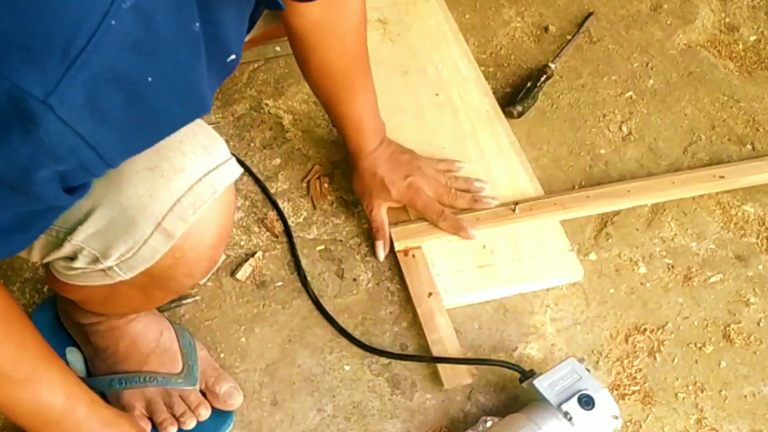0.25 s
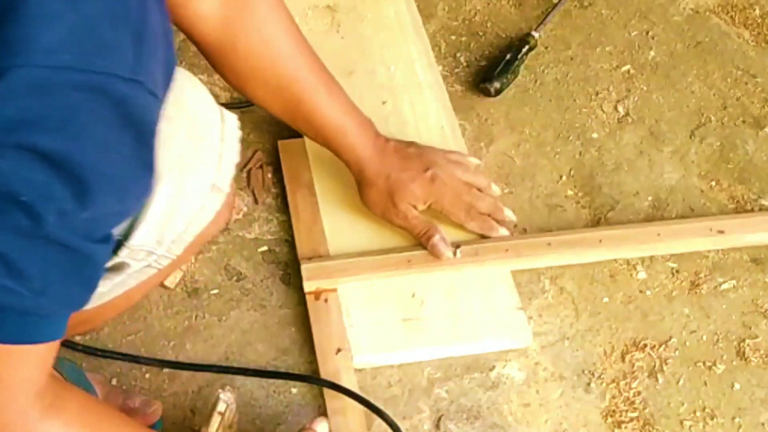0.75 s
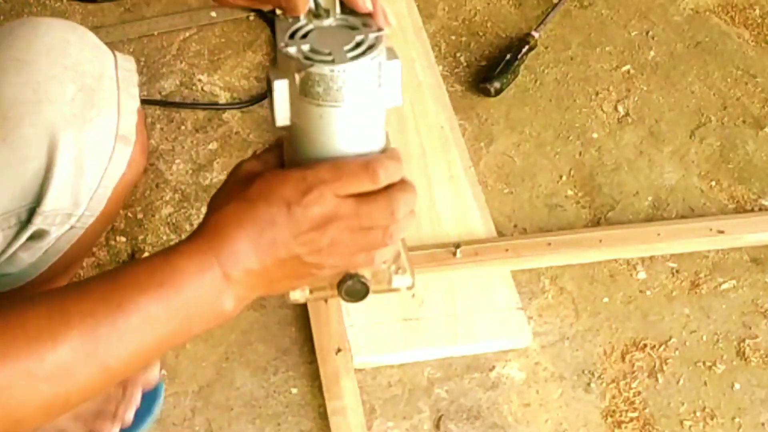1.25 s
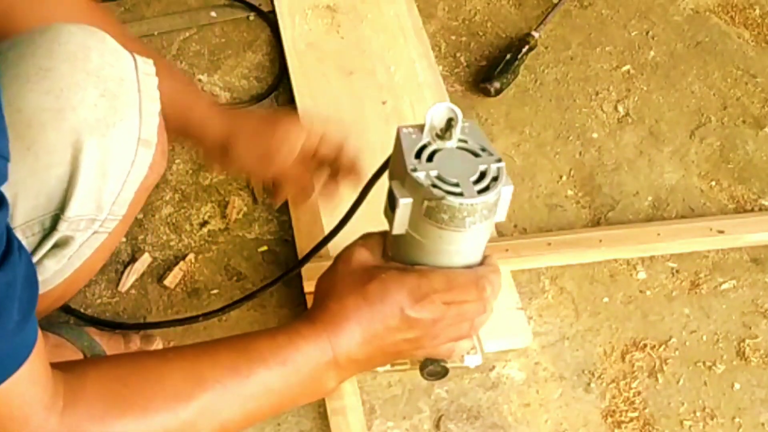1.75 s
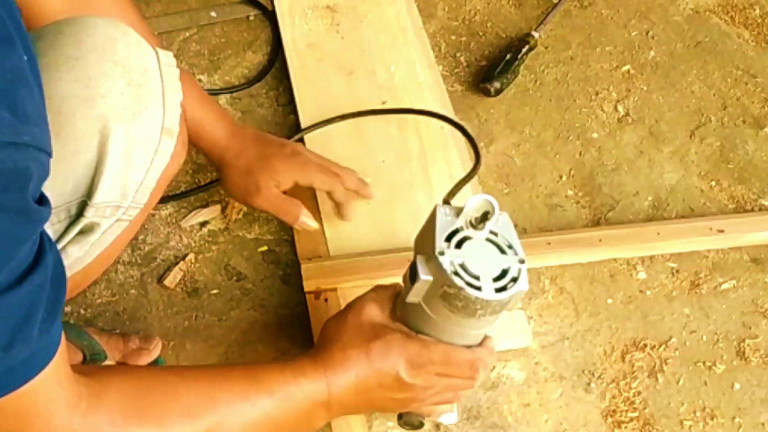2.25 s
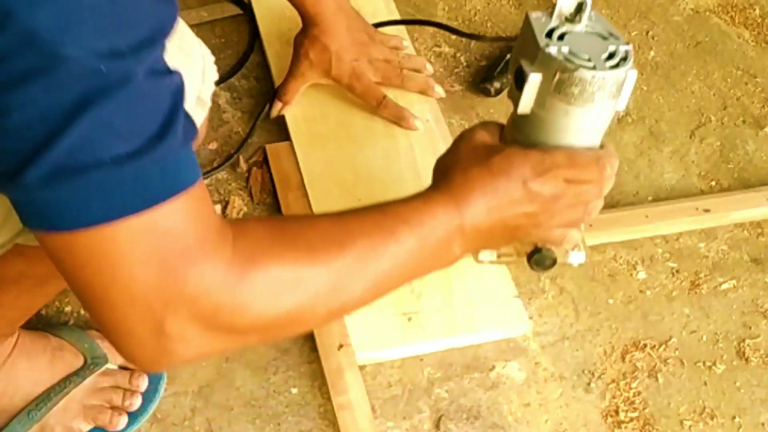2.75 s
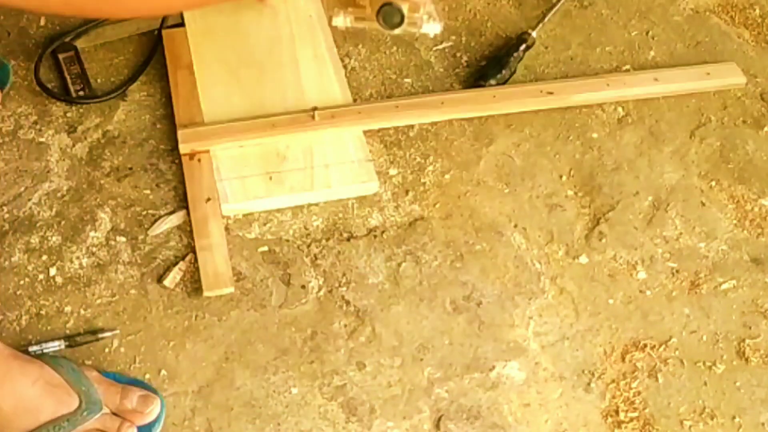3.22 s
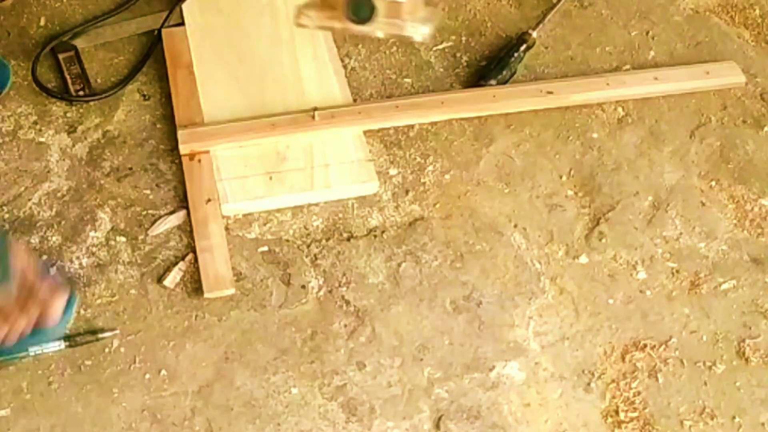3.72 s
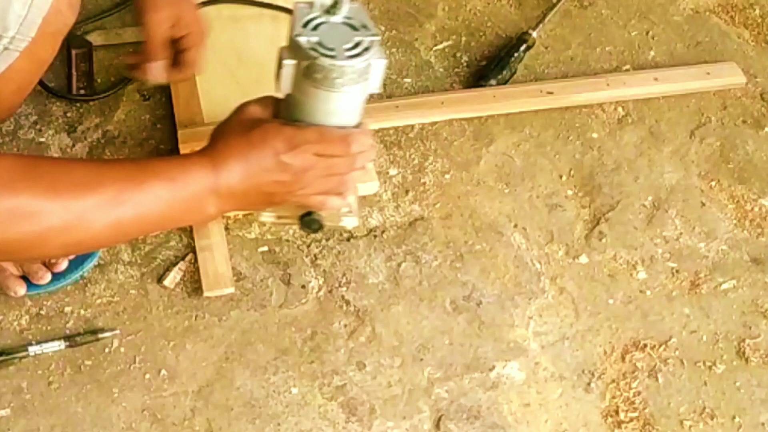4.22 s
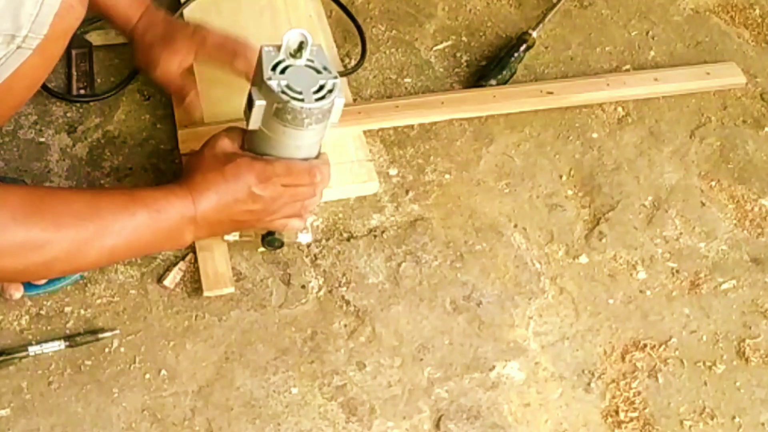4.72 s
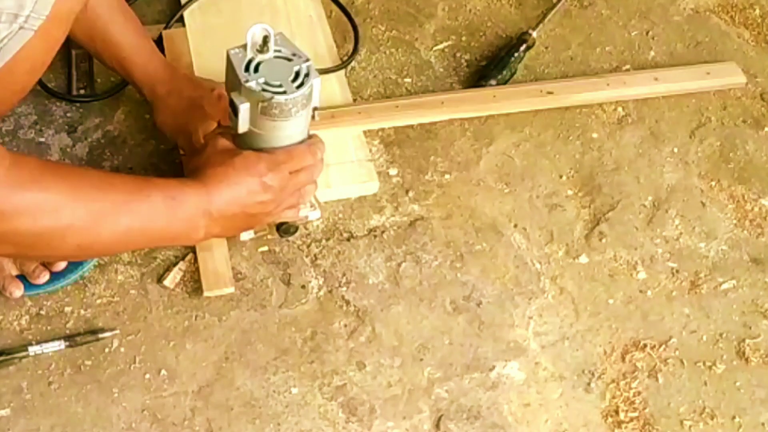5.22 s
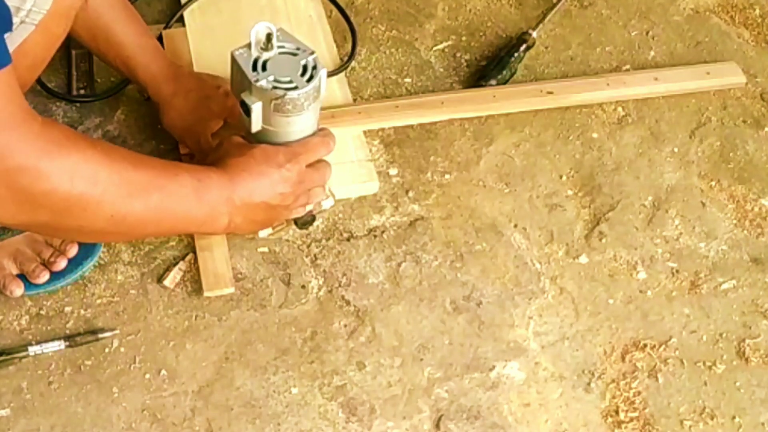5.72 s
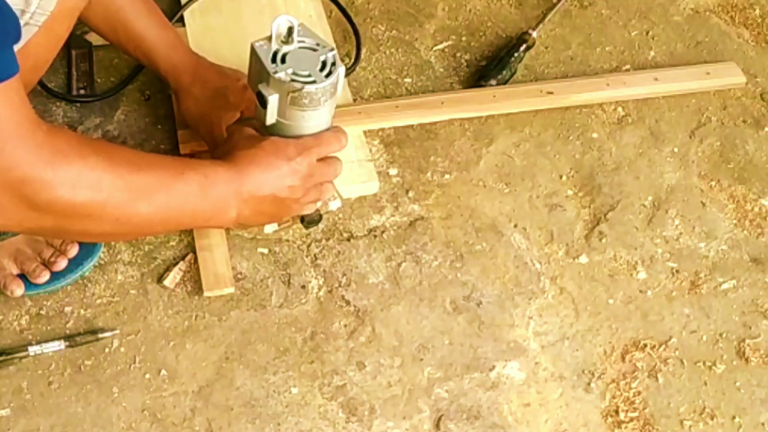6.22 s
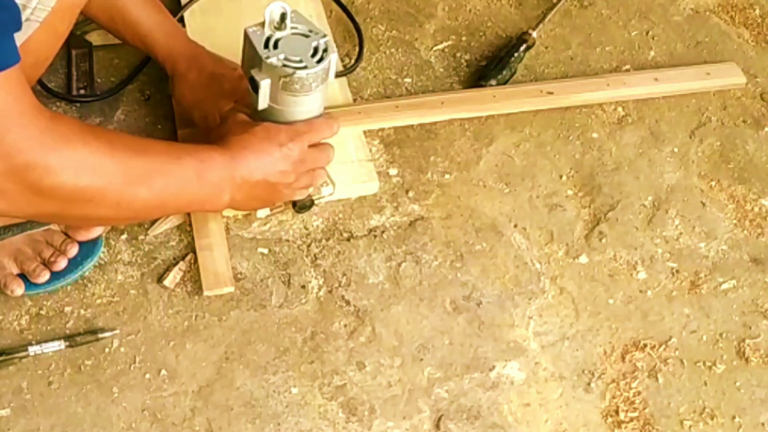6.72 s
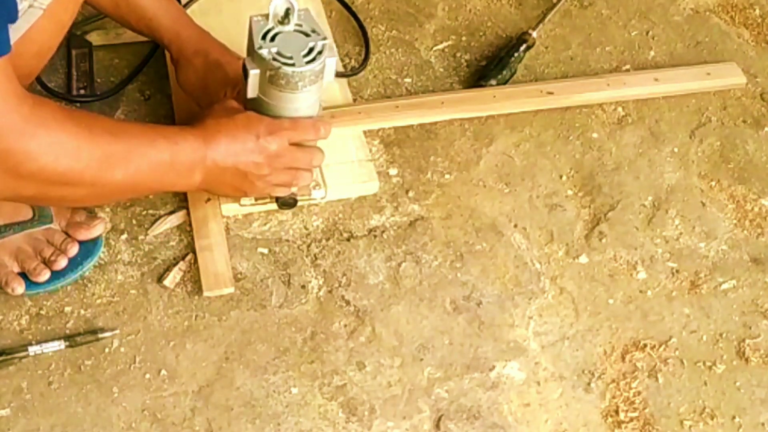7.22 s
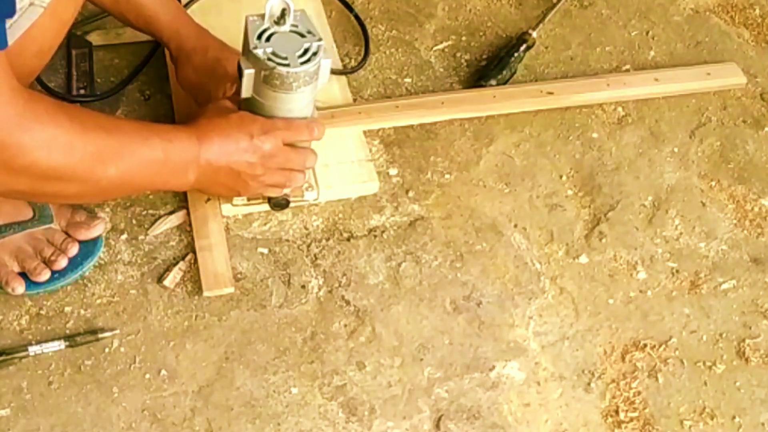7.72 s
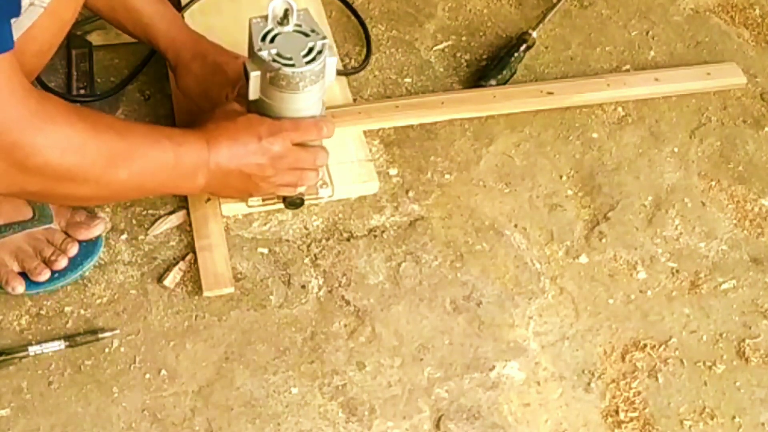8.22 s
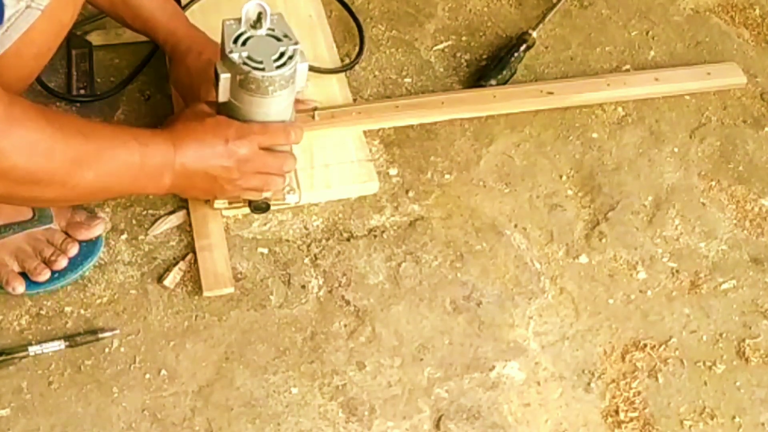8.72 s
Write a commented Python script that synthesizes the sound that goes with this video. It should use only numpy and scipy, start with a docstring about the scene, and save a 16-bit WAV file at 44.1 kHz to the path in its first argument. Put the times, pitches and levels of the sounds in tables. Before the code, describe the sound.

Close stereo pickup of woodworking on a hard floor. Soft rumble and small handling noises come first, then an electric trim router starts with a rough rising whirr and settles into a bright whine with strong fan hiss. One dull knock on wood while it runs free. After the base settles on the board, uneven bites of cutting buzz and squeal, the motor labouring lower between partial recoveries until the end.

```python
"""A workshop floor: a small trim router is picked up from a board amid low rumble, a squeak, scuffs and knocks.
Shaped noise makes the rumble and scuffs, gliding harmonics the squeak, and decaying wood modes the knocks.
Switched on, it spins up: its six-bladed fan whines in multiples of the shaft over a rush of air noise.
Then the two-flute bit is pushed into the wood again and again; each push drags the motor down.
The cut buzzes and squeals on multiples of the same shaft, with a rasp of bursting noise."""
import sys
import numpy as np
from scipy import signal
from scipy.fft import rfft, irfft, next_fast_len
from scipy.io import wavfile
from scipy.ndimage import uniform_filter1d, map_coordinates

SR = 44100
rng = np.random.default_rng(int(sys.argv[2]) if len(sys.argv) > 2 else 0)


def wav_record(signal):
    """Record a signal, one row per channel, as 16-bit PCM in the file named by sys.argv[1]."""
    frames = np.transpose(np.atleast_2d(signal))
    bounded = np.clip(frames, -1, 1)
    # unit amplitude maps onto the largest positive 16-bit level
    quanta = np.round(bounded * 32767).astype(np.int16)
    wavfile.write(sys.argv[1], SR, quanta)


N = 395136
T = np.arange(N) / SR  # seconds

# Colours are relative: each noise is brought to rms 1 before its level is set.
# colour of the background: freq_hz, density_db (per Hz)
SHOP_COLOUR = [(25, -31), (70, -13.5), (130, -2.5), (185, -0.5), (250, 4.5), (330, -4), (430, 0.5),
               (700, -9.5), (1200, -29), (4000, -31.5), (15000, -40)]
# level of the background, before its left-right balance: time_s, level_db
RUMBLE_LEVEL = [(0, -45), (.52, -44), (.63, -55), (.67, -41), (1.45, -42), (2.25, -46), (3.9, -41.5),
                (4.6, -49), (5.6, -53), (8.96, -50.5)]
# likeness of the two ears in every noise: freq_hz, correlation (0-1)
EAR_LIKENESS = [(100, 0.97), (1000, 0.64), (2200, 0.62), (4000, 0.052)]

# harmonics of the rough squeak: harmonic_number, relative_level_db
SQUEAK_HARMONICS = [(2, -6), (3, 3.5), (4, -7), (5, -4)]
# lines of the thin squeak: pitch_hz, level_db
THIN_SQUEAK = [(1810, -60), (2480, -64)]
# dull knocks on wood: start_s, level_db, pitch_hz, t60_s
KNOCKS = [(0.334, -40, 413, 0.043), (3.578, -16.5, 397, 0.052), (4.262, -37.5, 134, 0.17)]
# short rushes of noise, from handling, shuffling feet, the starting motor and the sliding base:
# start_s, length_s, level_db (before the grain), centre_hz, fall_db_per_octave (to either side)
SCUFFS = [(0.335, 0.014, -49, 850, 6.5), (0.65, 0.05, -51.5, 1100, 14), (.69, 0.05, -55, 6000, 12),
          (0.896, 0.079, -52, 2400, 4), (1.171, 0.068, -40.5, 1900, 4), (1.456, .006, -33, 4950, 8),
          (1.46, 0.59, -32, 15000, 13), (1.472, 1, -31.5, 1500, 7), (1.957, 0.58, -26, 2240, 87),
          (3.473, 0.27, -34.5, 340, 6), (4.211, 0.18, -41.5, 178, 10), (8.604, 0.19, -40, 446, 33)]

SWITCH_ON_S = 1.456
# the motor gathers speed in a quick, a middle and a slow stage: gain_turns_per_s, time_constant_s
SPIN_UP = [(180, .063), (246, .36), (124, 1.25)]
# each push of the bit into the wood:
# start_s, length_s, drag_turns_per_s, flute_level_db, octave_level_db, double_octave_level_db
PUSHES = [(5.232, 0.23, 11, -33, -34.5, -38), (5.433, 0.18, 33.4, -33.5, -26.5, -40),
          (5.581, .13, 55, -18, -30, -39), (5.723, .17, 49, -26, -26.5, -34),
          (5.887, 0.21, 21.3, -55, -41, -27), (6.475, 0.038, 4.2, -31, -50, -50),
          (6.668, 0.21, 22.2, -19.5, -42, -41), (7.083, 0.063, 21.5, -28, -50, -50),
          (7.255, .29, 33, -32.5, -40, -33), (7.753, 0.38, 56.3, -34, -45, -32.5),
          (8.272, 0.21, 11.7, -51, -35.5, -39), (8.7, 0.44, 66, -34, -31.5, -35)]
# steady drag of the bit as the slot deepens: time_s, drag_turns_per_s
SLOT_DRAG = [(5.3, 0), (6.1, 24), (7.6, 36.4), (8.3, 64)]
PUSH_RAMP_S, INERTIA_S = .03, .267  # a push sets in quickly; the motor's speed follows slowly
FULL_SAG = 280  # turns per second lost at full load
REFERENCE_SPEED = 611.6  # turns per second at which the fan's overtone and air levels are stated

# colour of the fan's air: freq_hz, density_db (per Hz)
AIR_COLOUR = [(120, -34), (400, -16), (942, -2.5), (1200, -2.5), (2320, 1.5), (4090, -1), (5650, 0.5),
              (9790, -5), (13100, -14.5), (15500, -13.5)]
AIR_DB, AIR_GROWTH_DB = -20.5, 54.5  # air at the reference speed; dB per tenfold speed
BRUSH_DB = -34.5  # hiss of the brushes, at any speed
PATCH_DB = 1.1  # depth of the shifting patches in the air and the rasp

# level of the fan's whine, before resonances, shake and fades: time_s, level_db
WHINE_LEVEL = [(1.55, -32), (1.7, -25), (1.87, -19), (2.1, -24.5), (2.7, -20), (3.2, -24.5), (4.8, -26),
               (5.35, -22), (7.9, -22), (8.4, -26.5), (8.9, -23)]
# as the tool is moved, a reflection cancels the whine at one ear or both; a negative loss lifts it:
# centre_s, half_length_s, left_loss_db, right_loss_db
WHINE_FADES = [(1.617, 0.013, 11, 11), (1.813, 0.016, 22, 12), (2.012, 0.017, 15, 15), (2.305, 0.13, 14, 7),
               (2.915, 0.053, 20, 1), (3.156, 0.14, 2, 13), (3.37, 0.07, 14, -6.5), (3.59, 0.061, 15, 12),
               (3.72, 0.11, 24, -1), (3.924, 0.035, 16, 14), (4.584, 0.023, 13, 15), (5.675, 0.13, 14, 10),
               (6.089, 0.066, 9, 13), (6.269, 0.11, 2.5, 15), (6.757, 0.025, 7, 12), (7.353, 0.038, 6, 5),
               (7.494, 0.035, 3, 24), (7.809, 0.014, 7, 9), (7.982, .018, 13, 4), (8.137, 0.055, 8, 1),
               (8.639, 0.095, 11, 17)]
# overtones of the blades and weaker tones of the rotor: shaft_multiple, relative_level_db, full_load_change_db
FAN_OVERTONES = [(7, -7, -2), (12, -4.5, 0), (18, .5, -2.5), (24, -2, -7)]
SHRILL_DB, SHRILL_GROWTH_DB = -33.5, 40  # overtones at the reference speed; dB per tenfold speed
START_SHAKE_DB = 5  # extra flutter of the whine at standstill, fading as the motor gathers speed
# a notch and two resonances of the housing: centre_hz, width_hz, gain_db
HOUSING = [(2920, 310, -3), (5580, 350, 6.5), (8540, 120, 11)]

# lines of the starting whirr, before its envelope, crackle and resonances: shaft_multiple, level_db
INRUSH_LINES = [(12, -31), (24, -36.5)]
INRUSH_RISE_S, INRUSH_FALL_S = .03, .15  # starting current
# resonances of the motor frame, met by the hum and the starting whirr: centre_hz, width_hz, boost_db
FRAME = [(470, 25, 11), (2800, 400, 14), (4900, 200, 12)]

# colour of the motor and bit on the board: freq_hz, density_db (per Hz)
RASP_COLOUR = [(90, -38), (620, -15.5), (950, 1.5), (1250, -5), (2150, 4), (2600, 4), (3500, -10.5),
               (8000, -8.5)]
# level of the rasp, before load and chip bursts: time_s, level_db
RASP_LEVEL = [(1.47, -48), (1.62, -39), (1.9, -29.5), (3.7, -28), (4.35, -70), (5.7, -51), (6.2, -30),
              (8.96, -29)]
WAKE_SHARE = .33  # share of the eddies that return one turn later

CONTACT_S, CONTACT_RISE_S = 4.43, 0.57  # the base settles on the board
# pressure from the tool's weight, from full load, and from a drag of FULL_SAG
REST_PRESSURE, LOAD_PRESSURE, PUSH_PRESSURE = 0.83, 0.15, 1
# lines of the buzz at a pressure of 1, before flicker and resonances: shaft_multiple, level_db
CUT_LINES = [(3, -44), (4, -43), (5, -45), (10, -45)]
# resonances of the board: centre_hz, width_hz, boost_db
BOARD = [(539, 10, 9), (1360, 60, 12)]
RUB_DB = -41.5  # the flutes' tone between pushes, at full load
GRAB_DB, FIRM_DB = 5.5, -31  # flicker of a light bite; the level at which it is halved
HUM_DB = -54  # the shaft's own tone, before the resonances of frame and board
# the bit catches and squeals; each line is weaker the farther it lies from the centre:
# start_s, length_s, level_db (at the centre), centre_hz, spread_hz
SQUEALS = [(5.708, 0.05, -31, 5800, 1800), (5.825, .2, -37, 7300, 1500), (6.691, 0.046, -34, 1547, 197),
           (8.07, 0.06, -33, 1383, 200), (8.3, .19, -40, 4700, 400), (8.745, 0.23, -38, 5200, 1000),
           (8.78, .2, -33.5, 1350, 200)]
SQUEAL_RAMP_S = .015

LEAD_S, TRAVEL_S = .0001, 2.88  # tool starts to the left: left ear's lead, time to reach the middle
# gain control: threshold, share of the excess taken off, averaging time
SQUEEZE_DB, SQUEEZE_SHARE, SQUEEZE_S = -20, .55, .025
TOP_HZ = 15550  # upper band limit


def amp(db):
    """Decibels to gain."""
    return 10 ** (np.asarray(db) / 20)


def unit(x):
    """Scaled to rms 1."""
    return x / np.sqrt(np.mean(x ** 2) + 1e-20)


def along(points, hz):
    """Frequency-and-value points read on a log frequency axis."""
    f, v = np.transpose(points)
    return np.interp(np.log(hz + 1), np.log(f), v)


def curves(rows):
    """One value per sample for each column after the time."""
    s, *cols = np.transpose(rows)
    return [np.interp(T, s, c) for c in cols]


def wobble(rate):
    """A smooth random curve, rate knots a second."""
    coarse = T[::32]
    knots = rng.standard_normal(int(T[-1] * rate) + 4)
    return np.interp(T, coarse, map_coordinates(knots, [coarse * rate]))


def held(s, length, ramp):
    """A gate that rises, holds and lets go."""
    rise = np.clip((T - s) / ramp, 0, 1)
    release = np.clip(1 - (T - s - length) / ramp, 0, 1)
    return rise * release


def filtered(x, response):
    """x times a response of frequency."""
    m = next_fast_len(N + SR // 2)
    return irfft(rfft(x, m) * response(np.fft.rfftfreq(m, 1 / SR)), m)[..., :N]


def noise(colour_db):
    """Stereo noise of rms 1, alike in the bass and unrelated in the treble."""
    def response(hz):
        turn = np.arccos(np.clip(along(EAR_LIKENESS, hz), -1, 1)) / 2
        return amp(colour_db(hz)) * [np.cos(turn), np.sin(turn)]
    mid, side = filtered(rng.standard_normal((2, N)), response)
    return unit(np.array([mid + side, mid - side]))


def patchy(x, depth_db):
    """Shifting reflections lift and sink patches of the spectrum."""
    z = signal.stft(x, nperseg=512)[2]
    field = rng.standard_normal(z.shape[1:])
    field = uniform_filter1d(field, size=7, axis=0)  # smooth across frequency
    field = uniform_filter1d(field, size=24, axis=1)  # smooth across time
    return signal.istft(z * amp(depth_db * unit(field)), nperseg=512)[1][:, :N]


def tone(phase, scatter, rate):
    """A line of rms 1: the direct sound plus reflections that drift differently at each ear."""
    sine, cosine = np.sin(phase), np.cos(phase)
    ears = [sine + scatter * (wobble(rate) * sine + wobble(rate) * cosine) for ear in range(2)]
    return unit(np.array(ears))


def boost(resonances, hz):
    """Gain for a line that glides through resonances."""
    return amp(sum(db / (1 + ((hz - centre) / width) ** 2) for centre, width, db in resonances))


def workshop():
    """The low rumble of the surroundings, as noise weighted to the bass."""
    level_db, = curves(RUMBLE_LEVEL)
    return amp(level_db) * noise(lambda hz: along(SHOP_COLOUR, hz))


def squeaks():
    """A rough squeak whose gliding harmonics fade to a trace, then a thin faint swell of steady lines."""
    # time_s, pitch_hz, level_db
    pitch, level_db = curves([(.03, 440, -97), (.075, 482, -56), (.1, 522, -49), (.24, 495, -75)])
    phase = 2 * np.pi * np.cumsum(pitch * (1 + 0.025 * wobble(198))) / SR
    partials = sum(amp(db) * tone(round(k) * phase, scatter=1.0, rate=165) for k, db in SQUEAK_HARMONICS)
    breath = amp(-5.0) * noise(lambda hz: along(AIR_COLOUR, hz))
    rough = amp(level_db) * (partials + breath)
    swell = np.exp(-((T - .45) / 0.13) ** 2)
    lines = sum(amp(db) * tone(2 * np.pi * hz * T, scatter=3.6, rate=280) for hz, db in THIN_SQUEAK)
    return rough + swell * lines


def knocks():
    """Each knock rings a low mode of the wood and a weaker, shorter upper one."""
    out = np.zeros(N)
    for s, db, hz, t60 in KNOCKS:
        t = np.maximum(T - s, 0)
        fade = amp(-60 * t / t60)
        low = np.sin(2 * np.pi * hz * t)
        upper = .5 * fade * np.sin(2 * np.pi * 2.5 * hz * t)
        attack = 1 - np.exp(-t / 0.0014)
        out += amp(db) * attack * fade * (low + upper)
    return out


def scuffs():
    """Things rub briefly: a quick rise, then a grainy fade."""
    out = np.zeros((2, N))
    for s, length, db, centre_hz, fall in SCUFFS:
        u = np.clip((T - s) / length, 0, 2)
        stroke = (1 - np.exp(-18 * u)) * np.exp(-2 * u ** 3)
        out += amp(db) * stroke * noise(lambda hz: -fall * abs(np.log2((hz + 1) / centre_hz)))
    grain = amp(0.56 * wobble(480))
    return out * grain


def pushes():
    """Drag, and the strengths of the flute tone and its two octaves, summed over the pushes."""
    drag, tones = np.zeros(N), np.zeros((3, N))
    for s, length, pull, *levels_db in PUSHES:
        gate = held(s, length, PUSH_RAMP_S)
        drag += pull * gate
        tones += amp(levels_db)[:, None] * gate
    return drag, tones


def motor(drag):
    """Speed and load 0-1: the motor runs up freely, and its inertia makes it sag slowly under drag."""
    since = np.maximum(T - SWITCH_ON_S, 1 / SR)
    free = sum(gain * (1 - np.exp(-since / lag)) for gain, lag in SPIN_UP)
    slot, = curves(SLOT_DRAG)
    keep = np.exp(-1 / (INERTIA_S * SR))
    sag = signal.lfilter([1 - keep], [1, -keep], slot + drag)
    load = np.clip(sag / FULL_SAG, 0, 1) ** 0.3
    return free - sag, load


def fan_air(speed):
    """The faster the fan, the more air it moves; the brushes hiss beneath."""
    fan_db = AIR_DB + AIR_GROWTH_DB * np.log10(speed / REFERENCE_SPEED)
    flow = np.hypot(amp(BRUSH_DB), amp(fan_db))
    rush = patchy(noise(lambda hz: along(AIR_COLOUR, hz)), PATCH_DB)
    return flow * amp(0.92 * wobble(30)) * rush


def inrush(shaft, speed):
    """Starting current makes the armature whirr roughly; lines flare as they sweep through frame resonances."""
    since = np.maximum(T - SWITCH_ON_S, 0)
    current = (1 - np.exp(-since / INRUSH_RISE_S)) * np.exp(-since / INRUSH_FALL_S)
    shaken = shaft + .075 * wobble(400)
    sparks = unit(amp(4 * wobble(90)))
    lines = sum(amp(db) * boost(FRAME, k * speed) * tone(round(k) * shaken, scatter=3.9, rate=300)
                for k, db in INRUSH_LINES)
    return current * sparks * lines


def fan(shaft, speed, load):
    """Six blades pass the housing: a clean whine, and overtones blurred by turbulence."""
    whine_db, = curves(WHINE_LEVEL)
    shrill_db = SHRILL_DB + SHRILL_GROWTH_DB * np.log10(speed / REFERENCE_SPEED)
    # the blades only sing once they move fast enough
    singing = np.clip(speed / 240, 0, 1) ** 2
    # the start and the cut shake the tool and roughen its whine
    slowness = 1 - speed / REFERENCE_SPEED
    shake = amp((0.78 + 0.5 * load + START_SHAKE_DB * slowness ** 2) * wobble(70))
    judder = slowness ** 1.3 * wobble(300)
    loss_db = sum(np.outer(ears, np.exp(-((T - s) / half) ** 4)) for s, half, *ears in WHINE_FADES)
    blades = tone(6 * shaft + judder, scatter=.2 + .1 * load, rate=55)
    whine = amp(whine_db - loss_db) * boost(HOUSING, 6 * speed) * shake * blades
    blurred = shaft + .04 * wobble(170)
    overtones = sum(amp(db + change * load) * boost(HOUSING, k * speed)
                    * tone(round(k) * blurred, scatter=1.0, rate=21) for k, db, change in FAN_OVERTONES)
    return singing * (whine + amp(shrill_db) * overtones)


def stirred(x, speed):
    """Each turn meets the eddies of the turn before: the noise gathers in broad bands that follow the shaft."""
    last_turn = np.array([np.interp(T - 1 / speed, T, ear) for ear in x])
    return unit(x + WAKE_SHARE * last_turn)


def rasp(speed, load):
    """The motor and bit on the board: chips tear off in bursts of noise, a little louder under load."""
    level_db, = curves(RASP_LEVEL)
    chips = amp(2.86 * wobble(300))
    scrape = patchy(noise(lambda hz: along(RASP_COLOUR, hz)), PATCH_DB)
    return amp(level_db + 2 * load) * chips * stirred(scrape, speed)


def flutter(strength):
    """The flutes grab and let go: a light bite flickers, a firm one is steadier."""
    depth_db = GRAB_DB / (1 + (strength / amp(FIRM_DB)) ** 2)
    # the squared term offsets the loudness that flicker adds
    return strength * amp(depth_db * wobble(50) - depth_db ** 2 / 10)


def squeals(shaft, speed):
    """The bit catches and briefly sings on the multiples of the shaft that lie near one pitch."""
    out = np.zeros((2, N))
    gates = np.array([amp(db) * held(s, length, SQUEAL_RAMP_S) for s, length, db, _, _ in SQUEALS])
    for k in (3, 10, 12, 14, 16):
        weights = [np.exp(-((k * np.interp(s, T, speed) - hz) / spread) ** 2 / 2)
                   for s, _, _, hz, spread in SQUEALS]
        out += (weights @ gates) * tone(k * shaft, scatter=1.0, rate=110)
    return out


def cut(shaft, speed, load, drag, tones):
    """Two flutes strike the wood on every turn; the uneven cut adds the other multiples."""
    flute, octave, double_octave = tones
    rub = amp(RUB_DB) * load
    flutes = (flutter(np.hypot(flute, rub)) * tone(2 * shaft, scatter=0.32, rate=59)
              + flutter(np.hypot(octave, rub)) * tone(4 * shaft, scatter=0.13, rate=44)
              + flutter(double_octave) * tone(8 * shaft, scatter=0.35, rate=110))
    # once the base rests on the board, the shaft's shaking passes into the wood
    contact = np.clip((T - CONTACT_S) / CONTACT_RISE_S, 0, 1)
    body = boost(FRAME, speed) ** (1 - contact / 2) * boost(BOARD, speed) ** contact
    hum = amp(HUM_DB) * body * tone(shaft, scatter=1.6, rate=70)
    pressure = contact * (REST_PRESSURE + LOAD_PRESSURE * load ** 4 + PUSH_PRESSURE * drag / FULL_SAG)
    bursts = unit(amp(3 * wobble(25)))
    buzz = sum(amp(db + 3 * wobble(12)) * boost(BOARD, k * speed) * tone(round(k) * shaft, scatter=1.0, rate=85)
               for k, db in CUT_LINES)
    return flutes + hum + squeals(shaft, speed) + pressure * bursts * buzz


def router():
    """Fan whine, air, and the buzz and rasp of the cut, all tied to one shaft."""
    drag, tones = pushes()
    speed, load = motor(drag)
    # shaft angle in radians, with a slight unsteadiness of speed
    shaft = 2 * np.pi * np.cumsum(speed * (1 + 0.00084 * wobble(60))) / SR
    running = np.clip((T - SWITCH_ON_S) / 0.0019, 0, 1)
    whirr = fan(shaft, speed, load) + inrush(shaft, speed)
    return running * (whirr + cut(shaft, speed, load, drag, tones) + fan_air(speed) + rasp(speed, load))


def placed(x):
    """The right ear hears the tool later until it has been brought over to the board."""
    lag = LEAD_S * np.clip((CONTACT_S + CONTACT_RISE_S - T) / TRAVEL_S, 0, 1)
    return np.array([x[0], map_coordinates(x[1], [(T - lag) * SR], order=5)])


def scene():
    """The router and the handling sounds over a background slightly stronger on the right."""
    background = workshop() * amp([[-.6], [.6]])
    return background + squeaks() + knocks() + scuffs() + placed(router())


def record(dry):
    """Gain control turns the loudest moments down, and a sharp low-pass removes the top of the treble."""
    power = abs(uniform_filter1d(np.mean(dry ** 2, axis=0), size=int(SQUEEZE_S * SR)))
    excess_db = np.maximum(10 * np.log10(power + 1e-12) - SQUEEZE_DB, 0)
    return filtered(dry * amp(-SQUEEZE_SHARE * excess_db), lambda hz: hz < TOP_HZ)


dry = scene()
out = record(dry)
wav_record(out)
```